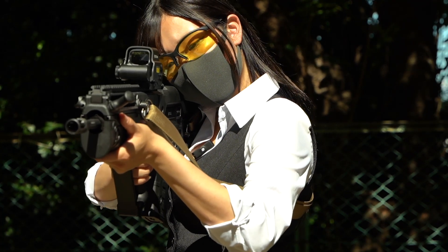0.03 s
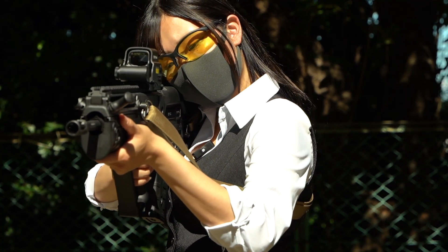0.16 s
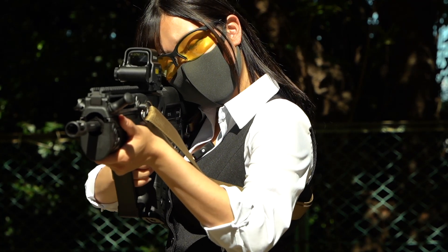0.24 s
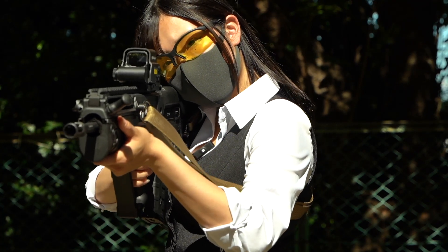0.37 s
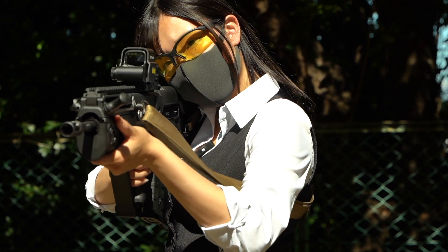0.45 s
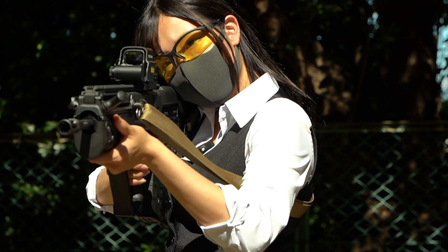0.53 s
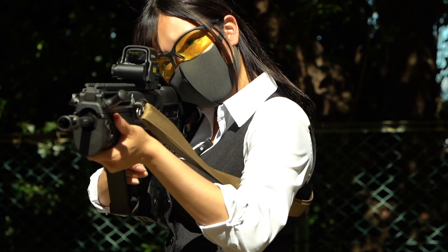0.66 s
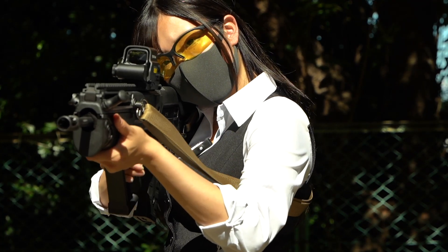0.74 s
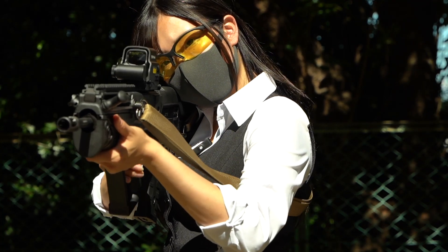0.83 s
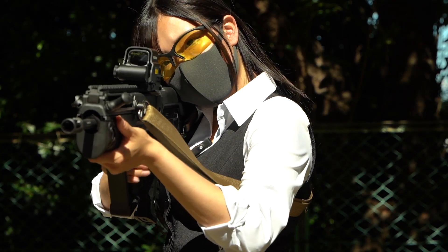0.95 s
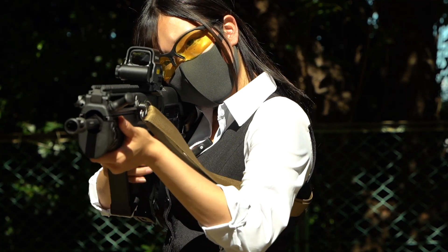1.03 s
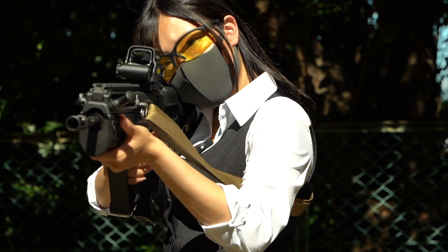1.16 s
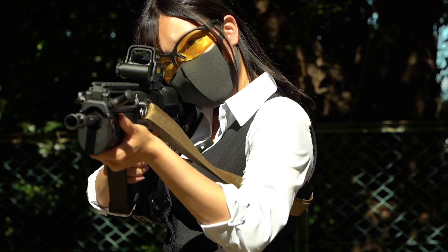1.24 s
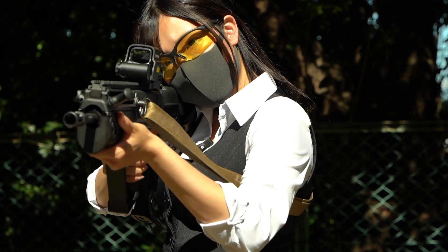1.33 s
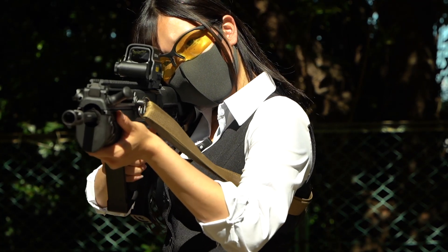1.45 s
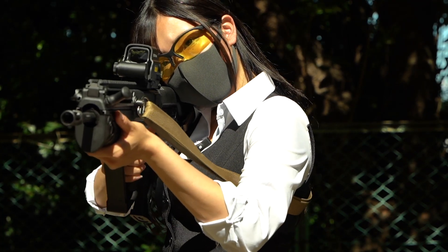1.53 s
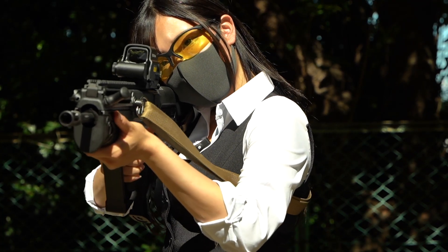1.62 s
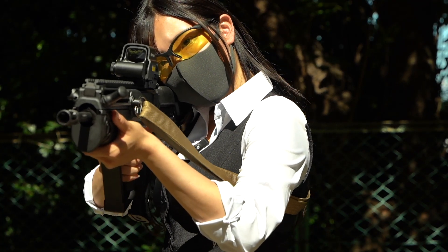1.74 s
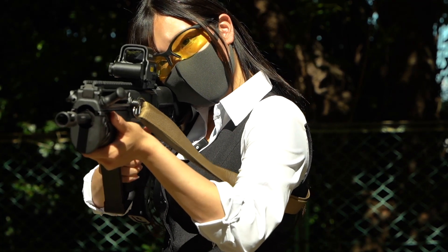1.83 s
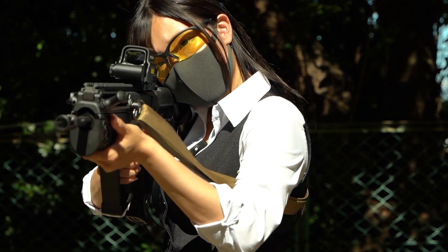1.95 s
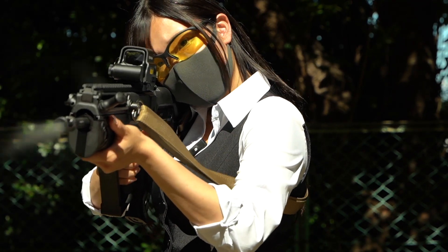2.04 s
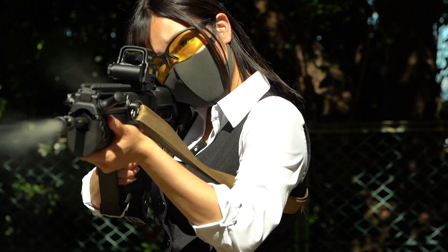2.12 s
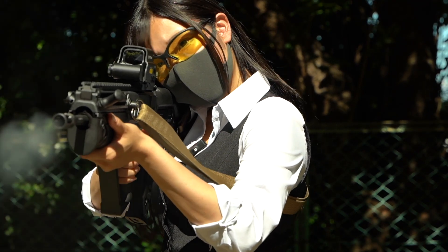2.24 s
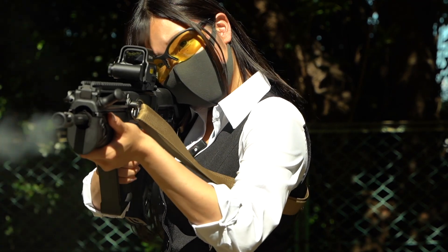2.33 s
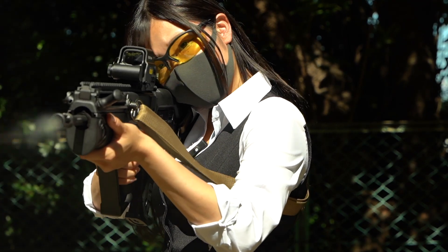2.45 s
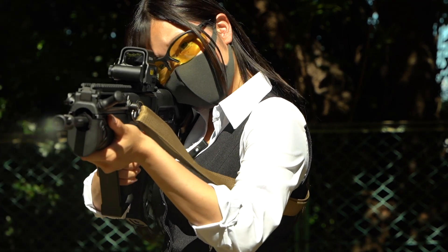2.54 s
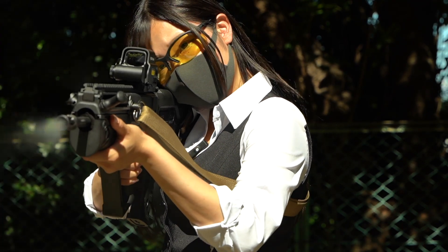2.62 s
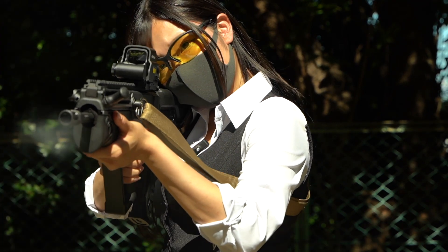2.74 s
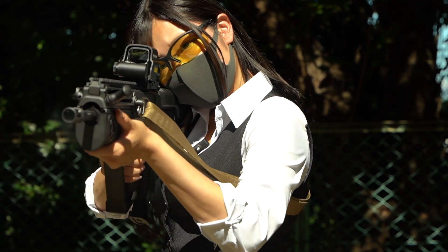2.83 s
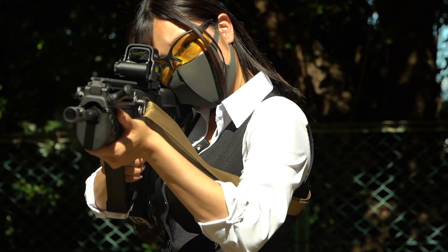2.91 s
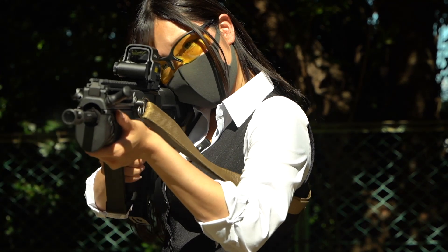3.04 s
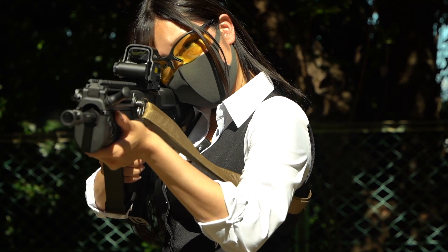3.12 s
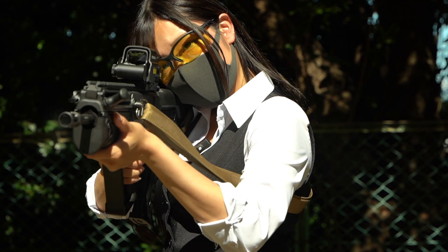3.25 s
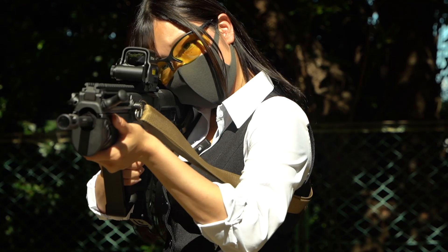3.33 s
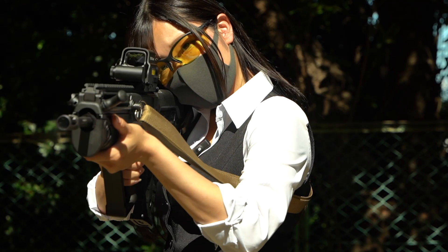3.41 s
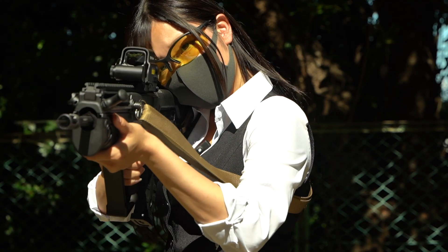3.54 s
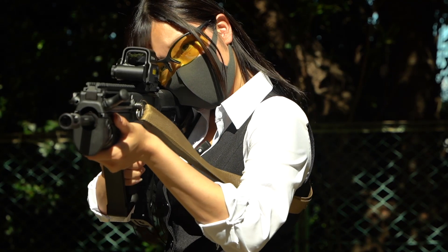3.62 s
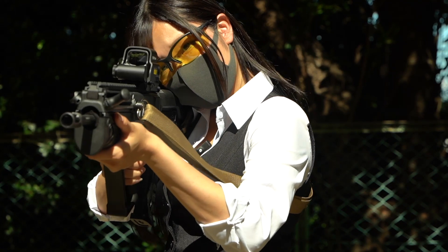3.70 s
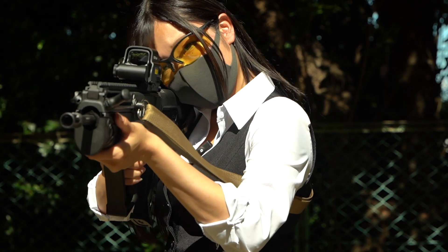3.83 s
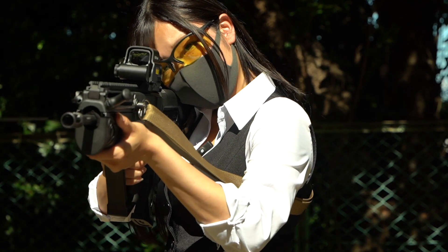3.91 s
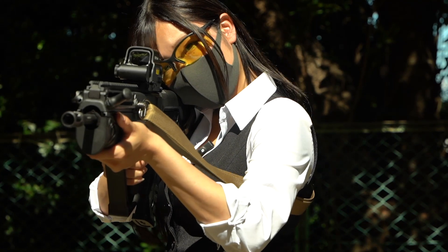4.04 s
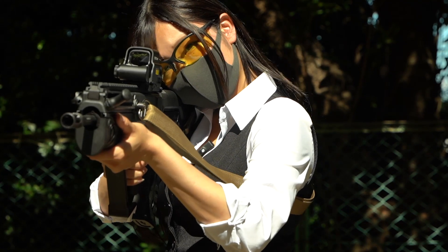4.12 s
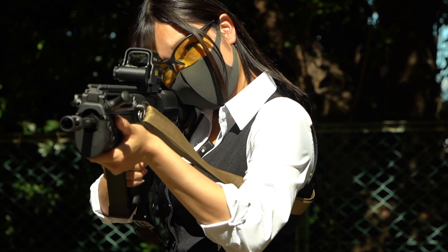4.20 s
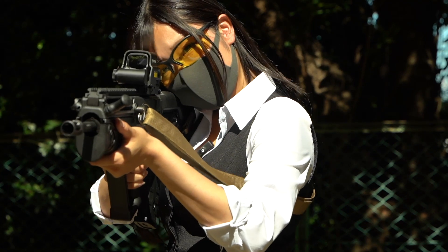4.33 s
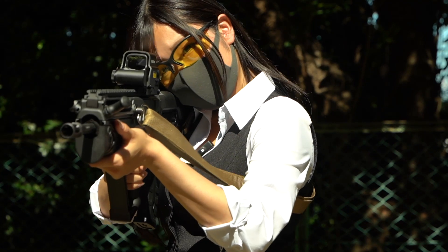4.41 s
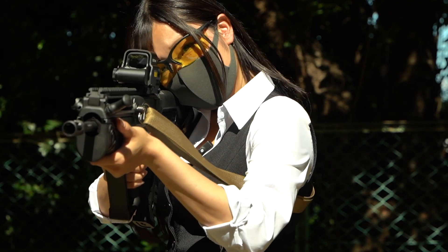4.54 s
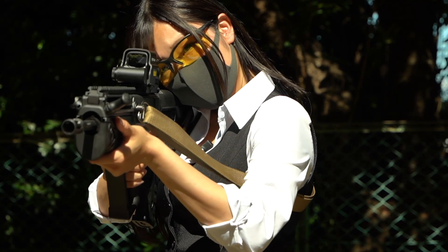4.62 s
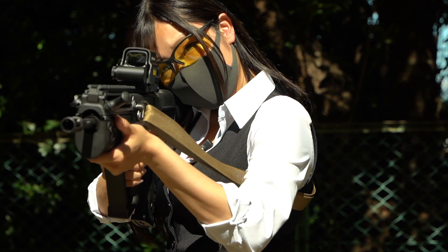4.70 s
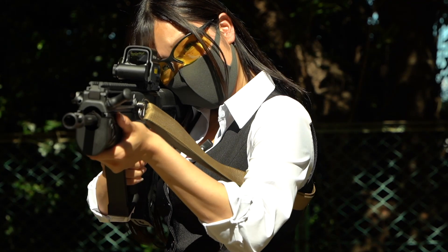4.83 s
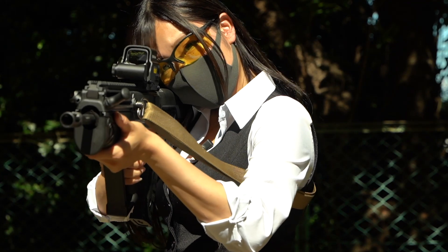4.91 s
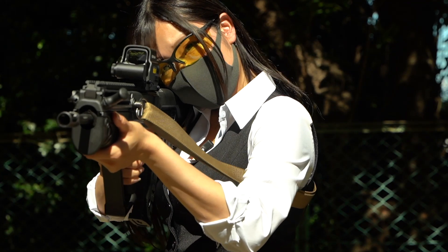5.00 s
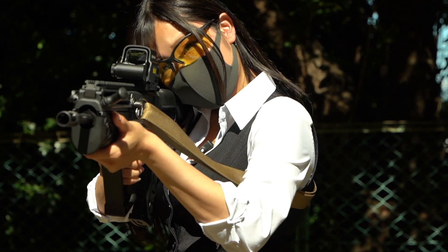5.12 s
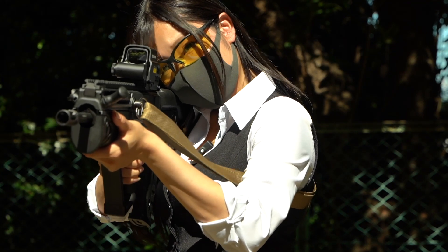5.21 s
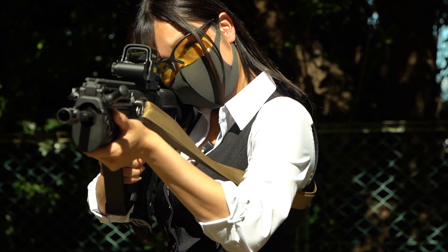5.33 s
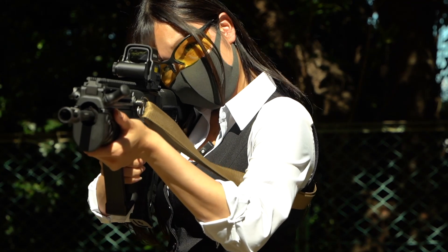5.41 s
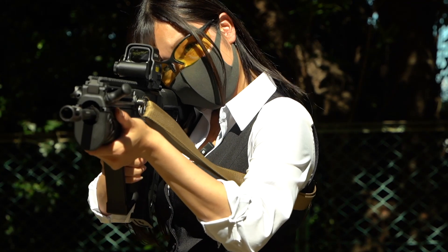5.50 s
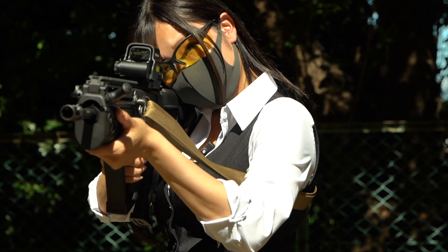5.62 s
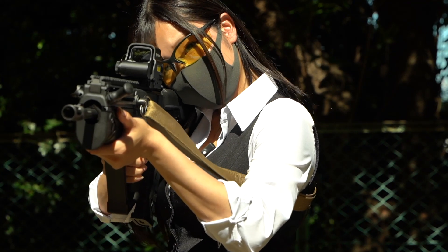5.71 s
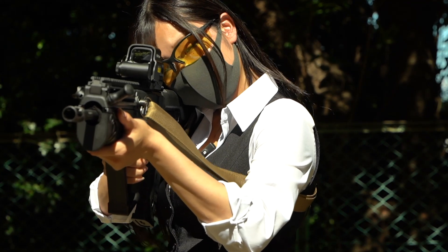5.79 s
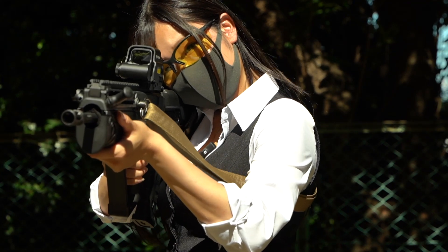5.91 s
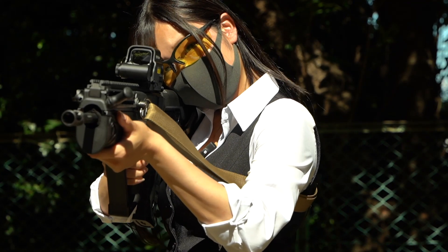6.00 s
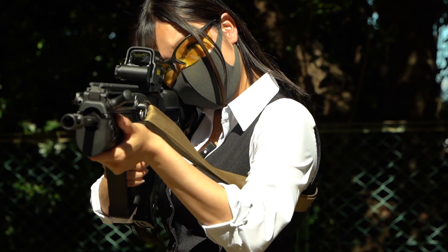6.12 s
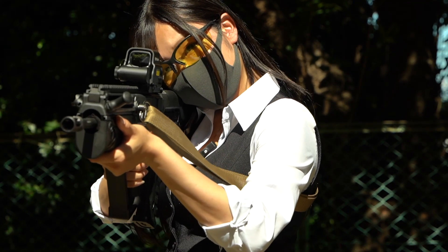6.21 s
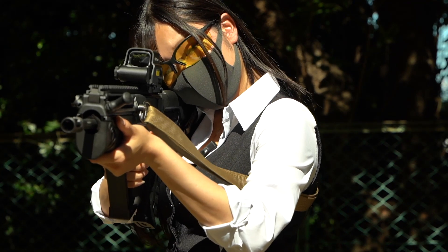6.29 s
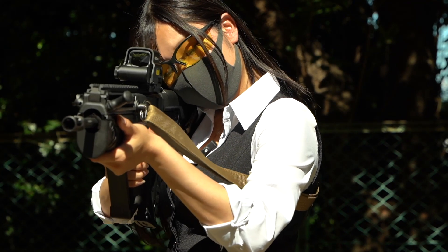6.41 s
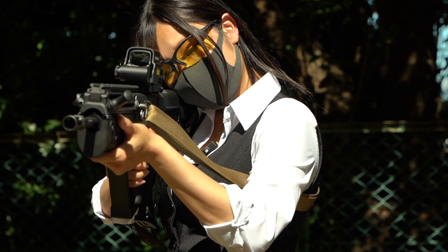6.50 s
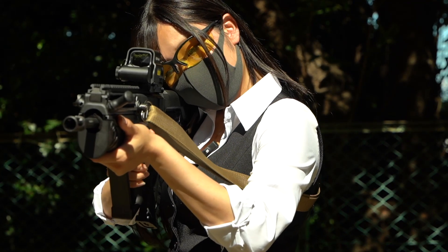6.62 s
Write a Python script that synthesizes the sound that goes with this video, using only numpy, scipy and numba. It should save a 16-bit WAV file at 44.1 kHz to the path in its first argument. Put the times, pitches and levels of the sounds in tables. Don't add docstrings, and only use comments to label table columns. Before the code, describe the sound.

Close microphone in a wood. Shrill steady cicadas swell slightly while a strap and grip tick and knock, with soft gusts and leaves. After nearly two seconds a toy gas rifle clatters continuously for over four seconds, each shot a dry puff with several bolt knocks and a thin spring ring, overloading the microphone. The rate sags, then only subdued insect hiss remains.

```python
import sys
import numpy as np
from scipy import signal
from scipy.fft import rfft, irfft
from scipy.io import wavfile
from scipy.ndimage import uniform_filter1d
from numba import njit

SR = 44100
rng = np.random.default_rng(int(sys.argv[2]) if len(sys.argv) > 2 else 0)


def output_pcm(signal):
    pcm = np.clip(np.atleast_2d(signal).T, -1, 1) * 32767
    wavfile.write(sys.argv[1], SR, np.round(pcm).astype(np.int16))


def level_to_linear(level):
    exponent = np.asarray(level, float) / 20
    return 10 ** exponent


N = 293435


def ring(x, modes):
    out = 0
    for k, (hz, width_hz, db) in enumerate(modes):
        out = out + (-1) ** k * level_to_linear(db) * signal.lfilter(*signal.iirpeak(hz, hz / width_hz, SR), x)
    return out


def band(lo_hz, hi_hz, order=2):
    sos = signal.butter(order, [lo_hz, hi_hz], "band", fs=SR, output="sos")
    x = signal.sosfilt(sos, rng.standard_normal(N))
    return x / x.std()


def walk(rate_hz):
    k = int(SR / rate_hz)
    steps = np.repeat(rng.standard_normal(N // k + 1), k)
    x = uniform_filter1d(uniform_filter1d(steps, k), k)[:N]
    return x / x.std()


def humps(t, s, half_s, db):
    return np.sum(db[:, None] * np.exp(-((t - s[:, None]) / half_s[:, None]) ** 2), axis=0)


def burst(s, db, decay_ms):
    x = np.zeros(N)
    np.add.at(x, (np.asarray(s) * SR).astype(int), level_to_linear(db))
    fall = np.exp(-1000 / (decay_ms * SR))
    return uniform_filter1d(signal.lfilter([1], [1, -fall], x), size=9)


# (frequency [Hz], level per Hz [dB])
CHORUS_TONE = [(2650, -69), (4500, -29), (4850, -30.5), (5620, -24.5), (6990, -4), (8030, 3), (9410, -9),
               (10900, -25.5), (13900, -34), (16000, -34)]


def cicadas(t, shot_s):
    swell_s, swell_db_per_s = 1.1, 2
    level = level_to_linear(-22 + swell_db_per_s * np.clip(t - swell_s, 0, shot_s - swell_s))
    hz, db = np.transpose(CHORUS_TONE)
    tone = level_to_linear(np.interp(np.log(np.fft.rfftfreq(N, 1 / SR) + 1), np.log(hz), db))
    grains = rng.standard_normal(N) * level_to_linear(0.4 * walk(210) + 0.46 * walk(12))
    chorus = irfft(rfft(grains) * tone, N)
    return level * chorus / chorus.std()


def low_singer(t):
    near_db, far_db, stops_s = -35, -47, 1.23
    singing = np.clip((stops_s - t) / 0.08 + 0.5, 0, 1)
    return level_to_linear(far_db + (near_db - far_db) * singing) * level_to_linear(0.93 * walk(120.4)) * band(5310, 6540, order=4)


# (time [s], half length [s], rumble rise [dB], leaves rise [dB])
SWELL_TIMES = [(0.158, 0.076, 5.5, 3), (0.65, 0.22, 7.5, 11), (0.883, 0.14, 3.5, 2), (1.19, 0.16, 3.5, 6),
               (1.683, .12, 9, 6.5)]


def rumble_and_leaves(t):
    s, half_s, rumble_db, leaves_db = np.transpose(SWELL_TIMES)
    rumble = level_to_linear(-43.5 + humps(t, s, half_s, rumble_db)) * level_to_linear(2.6 * walk(14.13))
    leaves = level_to_linear(-51.5 + humps(t, s, half_s, leaves_db)) * level_to_linear(2.0 * walk(21.86))
    return rumble * (band(410, 740) + 0.5 * band(194, 310)) + leaves * band(900, 3600)


# (time [s], half length [s], rise [dB])
GUST_TIMES = [(0.1, 0.21, 13.5), (0.37, 0.042, 10), (0.57, .06, 7), (0.903, 0.31, 14.5), (1.064, .04, 1),
              (1.27, .03, 7), (1.39, .03, 2), (1.582, 0.04, 8.5), (1.72, 0.083, 7), (6.5, 0.018, 13)]


def wind(t):
    level = level_to_linear(-44.5 + humps(t, *np.transpose(GUST_TIMES)))
    return level * level_to_linear(3.2 * walk(9)) * (band(50, 125) + 0.62 * band(30, 170))


def wood():
    t = np.arange(N) / SR
    shot_s = FIRST_KNOCKS[0][0]
    sound = cicadas(t, shot_s) + low_singer(t) + rumble_and_leaves(t) + wind(t)
    duck_db, recover_s, recover_db = -21.5, 5.88, 9.5
    recovery = np.clip((t - recover_s) / 0.35 + 0.5, 0, 1)
    return sound * level_to_linear(duck_db * (t > shot_s) + recover_db * recovery)


# (time [s], level [dB], knock level over tick [dB], knock pitch [Hz])
TICK_TIMES = [(0.0218, -34, 1, 600), (0.1494, -34, 0, 600), (0.191, -36, 9, 600), (0.3207, -37, -10, 600),
              (0.3514, -21.5, -21, 600), (0.363, -29.5, -1, 800), (0.431, -19, 6.5, 700),
              (0.443, -29, 5, 700), (0.4853, -28, 3, 700), (0.5003, -14.5, -1, 600),
              (0.7208, -18, -5, 1200), (1.003, -29, -11, 600), (1.141, -30, -11, 600),
              (1.5358, -37, 8, 1000), (1.7847, -42.5, 20.5, 920), (6.469, -30.5, -2, 520),
              (6.477, -50, 24, 149)]


def handling():
    s, db, low_db, low_hz = np.transpose(TICK_TIMES)
    noise = rng.standard_normal((2, N))
    sound = ring(burst(s, db + 9, 2.7) * noise[0], [(1580, 270, 0.035), (2910, 520, 0.004)])
    for at, level, hz in zip(s, db + low_db, low_hz):
        sound += ring(burst([at], level + 15.8, 4.9) * noise[1], [(hz, hz / 3.16, 0)])
    return sound + 1.2 * trees(sound)


def trees(x):
    t60_s, build_up_s = 0.42, 0.04
    t = np.arange(SR) / SR
    tail = rng.standard_normal(SR) * level_to_linear(-60 * t / t60_s) * np.clip(t / build_up_s, 0, 1) ** 4
    tail = signal.lfilter(*signal.butter(1, 1800, fs=SR), tail) + 0.6 * tail
    return level_to_linear(-28.5) * signal.fftconvolve(x, tail / np.sqrt(np.sum(tail ** 2)))[:N]


# (shots fired [count], time [s])
FIRING = [(0, 1.884), (4, 2.1994), (6, 2.3594), (9, 2.6052), (13, 2.9405), (19, 3.4612), (24, 3.9049),
          (27, 4.1797), (31, 4.5587), (32, 4.6552), (35, 4.9597), (38, 5.2717), (39, 5.3849), (40, 5.4913),
          (43, 5.8052), (45, 6.0103), (46, 6.1185), (47, 6.2175)]


def strokes():
    count, s = np.transpose(FIRING)
    shot = np.arange(count[-1])
    blast = np.interp(np.arange(count[-1] + 1), count, s)
    cycle_ms = 1000 * np.diff(blast)
    warm_ms, cold_ms = 78, 105
    slow = np.clip((cycle_ms - warm_ms) / (cold_ms - warm_ms), 0, 1)
    slow[-1] = 1
    hammer = cycle_ms - 6.5 - 7 * slow
    home = hammer - 14
    slack = 74.4 - 0.95 * (shot - 37)
    lags_ms = dict(blast=0 * shot,
                   nozzle=13.3 + 11 * slow,
                   buffer=25.4 + 5.8 * slow ** 2 + 3 * (shot == shot[-1]),
                   pickup=np.minimum(home - 5.6, slack),
                   home=home,
                   hammer=hammer)
    return {name: blast[:-1] + ms / 1000 for name, ms in lags_ms.items()}, slow ** 2


STROKE_KNOCKS = {"blast": [(0.2, 6.5, 15, 3.4), (6, -7.5, -1, 3.8), (10, 1, 7, 4.5)],
                 "nozzle": [(0.3, 8, -18.5, 2.17)], "buffer": [(0.25, 3, -2, 2.6), (17.5, -8, 14, 2.9),
                 (3.53, 10.5, -31.5, 2.97)], "pickup": [(-7.5, -13, -9.5, 4.7), (0.6, -7.5, 5.5, 4.9)],
                 "home": [(0.2, 15.5, -8.5, 3.15), (5.5, -6, 0.5, 2.7)], "hammer": [(0.3, 1.5, -4, 4.14)]}
# (time [s], level [dB], sounds like knock [number])
FIRST_KNOCKS = [
    (1.863, -5.5, 4),
    (1.866, 24, 4),
    (1.8775, 3, 4),
]
# (body [dB], clack [dB], crack [dB], thud [dB])
KNOCK_PARTS = [(-6.5, -4.5, 4.5, -24), (4.5, -31, 6, -7.5), (-5.5, -5.5, 6.5, -5.5), (-6.5, 4, -20, -0.5),
               (-5.5, 5, -8, -15), (-8, -6.5, -9, -34), (-4, 0, -19.5, -36), (6, 11.5, -17.5, -45),
               (-3.5, 0.5, -0.5, -15), (-3, 4.5, 10, -9), (6, -11.5, -11, -12), (-0.5, 12.5, -3.5, -16)]
# (frequency [Hz], width [Hz], level [dB])
BODY_MODES = [(530, 226, -0.5), (744, 124, 7), (994, 330, -0.5)]
# (frequency [Hz], width [Hz], level [dB])
CLACK_MODES = [(2116, 564, 3), (2758, 495, 4), (3810, 990, -3.5)]
# (frequency [Hz], width [Hz], level [dB])
CRACK_MODES = [(4480, 3300, 6), (6330, 1200, 12), (7720, 410, 7.5), (12200, 3100, -16)]
# (frequency [Hz], width [Hz], level [dB])
THUD_MODES = [(178, 510, 1.5), (324, 220, -21)]


def bolt_knocks(at, cold):
    knocks = [(at[name], *row) for name, rows in STROKE_KNOCKS.items() for row in rows]
    chance = rng.standard_normal((len(cold), 2, len(knocks)))
    jitter_ms, strike_db = 0.35, 17
    shake, strike = np.zeros((4, N)), np.zeros((4, N))
    for k, ((s, lag_ms, db, cold_db, decay_ms), parts_db) in enumerate(zip(knocks, KNOCK_PARTS)):
        first = [f for f in FIRST_KNOCKS if round(f[2]) == k]
        times = s + (lag_ms + jitter_ms * chance[:, 0, k]) / 1000
        levels = db + cold_db * cold + 2 * chance[:, 1, k]
        times = np.array([*times, *(f[0] for f in first)])
        levels = np.array([*levels, *(f[1] for f in first)])
        share = level_to_linear(np.array(parts_db))[:, None]
        shake += share * burst(times, levels, decay_ms)
        strike += share * burst(times, levels + strike_db, 0.073)
    shake[2] *= shake[2] / (shake[2] + 2.4)
    body, clack, crack, thud = shake * rng.standard_normal((4, N))
    out = level_to_linear(15) * ring(body + strike[0], BODY_MODES)
    out += level_to_linear(11.5) * ring(clack + 0.18 * strike[1], CLACK_MODES)
    out += level_to_linear(-4.0) * ring(crack, CRACK_MODES)
    return out + level_to_linear(14.5) * ring(thud, THUD_MODES)


def gas_puffs(s, db, cold):
    start_hz, end_hz, fall_ms, peak_ms = 1498, 158.7, 3.6, 3.85
    at = np.arange(SR // 30)
    t_ms = at / SR * 1000 / (1 + 0.318 * cold[:, None])
    glide = (start_hz - end_hz) * fall_ms * (1 - np.exp(-t_ms / fall_ms))
    turns = (end_hz * t_ms + glide) / 1000
    swell = t_ms / peak_ms * np.exp(1 - t_ms / peak_ms)
    out = np.zeros(N)
    start = (s * SR).astype(int)[:, None]
    np.add.at(out, start + at, level_to_linear(db)[:, None] * np.sin(2 * np.pi * turns) * swell)
    return out


# (frequency [Hz], width [Hz], level [dB])
SPRING_MODE = (12800, 70, 2)


def spring_ring(blast, cold):
    level = 4.0 * rng.standard_normal(len(cold)) + 5.5 * cold
    return ring(burst(blast + 0.013, level, 7.5) * rng.standard_normal(N), [SPRING_MODE])


def rifle():
    at, cold = strokes()
    muzzle = gas_puffs(at["blast"], 5.66 + 1.0 * cold, cold)
    squeezed = gas_puffs(at["home"] - 0.002, 2.5 - 7 * cold, cold)
    return bolt_knocks(at, cold) + spring_ring(at["blast"], cold) + muzzle + squeezed


def scene():
    gun = rifle()
    return (wood() + handling() + gun + trees(gun))[None]


@njit
def limiter(x, top, attack, release):
    y, e = np.empty(len(x)), top
    for i in range(len(x)):
        a = max(abs(x[i]), top)
        e += (a - e) * (attack if a > e else release)
        y[i] = x[i] * top / e
    return y


def low_pass(x):
    return signal.sosfilt(signal.butter(12, 16400, fs=SR, output="sos"), x)


def record(dry):
    x = np.clip(dry[0], -1.5, 1.5)
    x = signal.lfilter(*signal.butter(1, 110, "high", fs=SR), x)
    attack_ms, release_ms = 3.2, 15
    x = limiter(x, 0.41, 1000 / (attack_ms * SR), 1000 / (release_ms * SR))
    treble_cut = signal.ellip(8, 0.2, 50, 15950, fs=SR, output="sos")
    x = signal.sosfilt(treble_cut, np.clip(x, -1, 1))
    mix = np.clip(x, -1, 1)[None]
    return low_pass(mix)


dry = scene()
out = record(dry)
output_pcm(out)
```